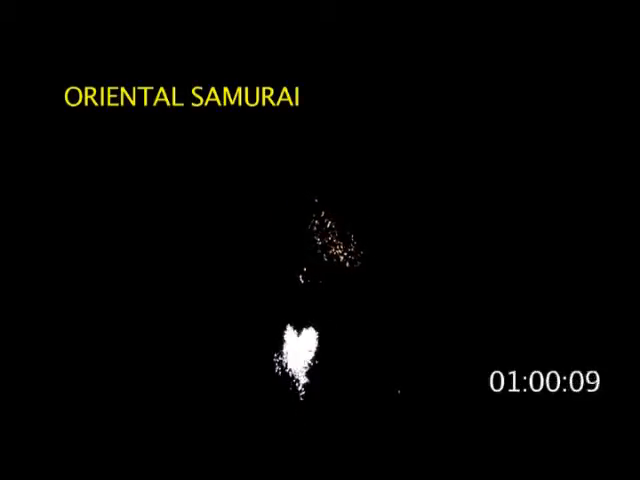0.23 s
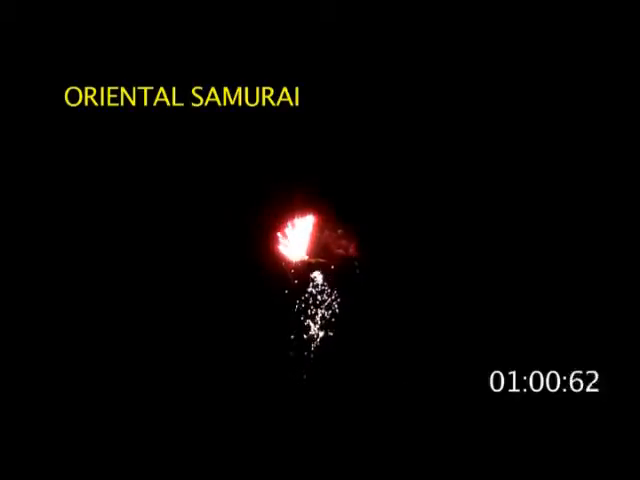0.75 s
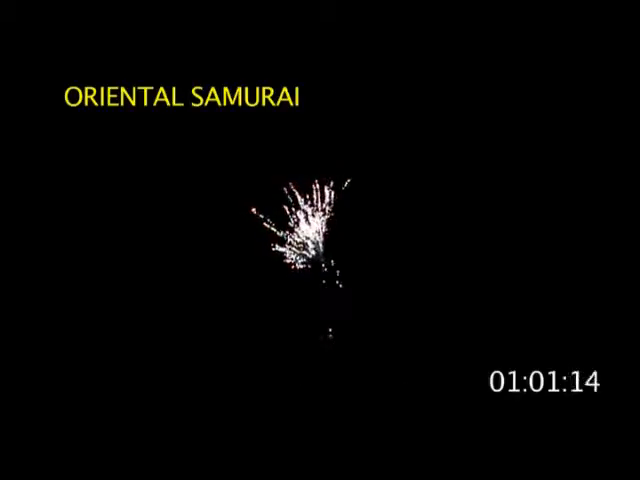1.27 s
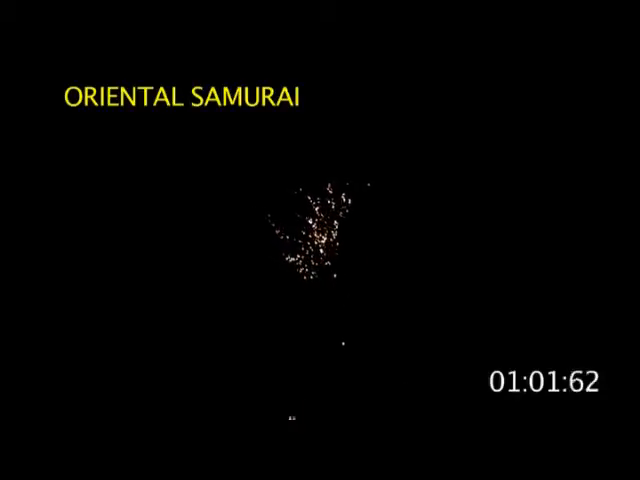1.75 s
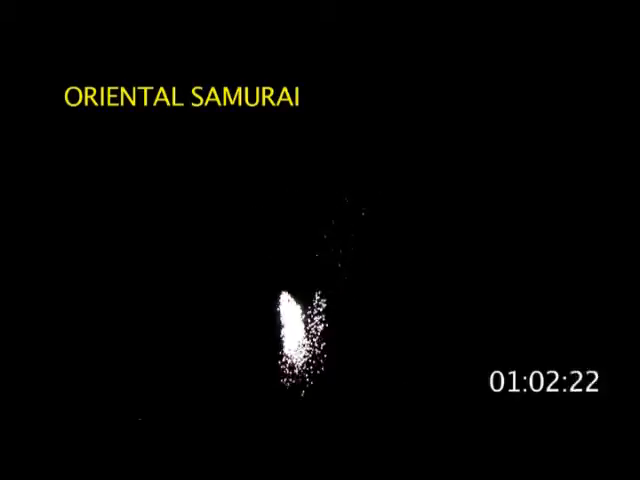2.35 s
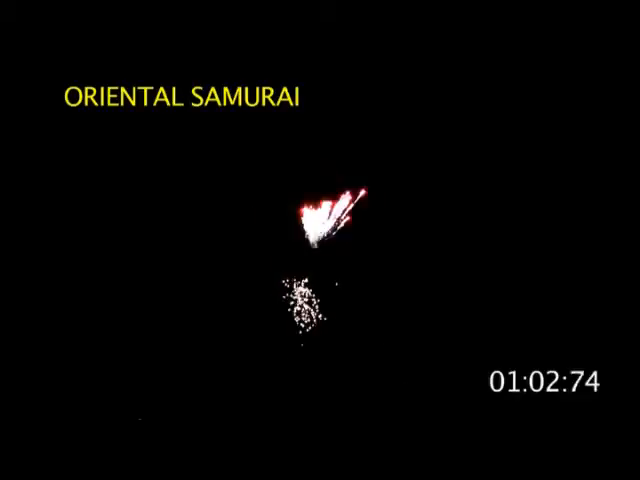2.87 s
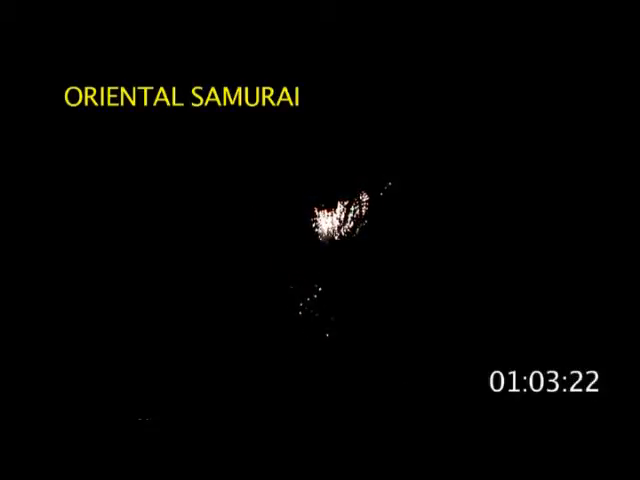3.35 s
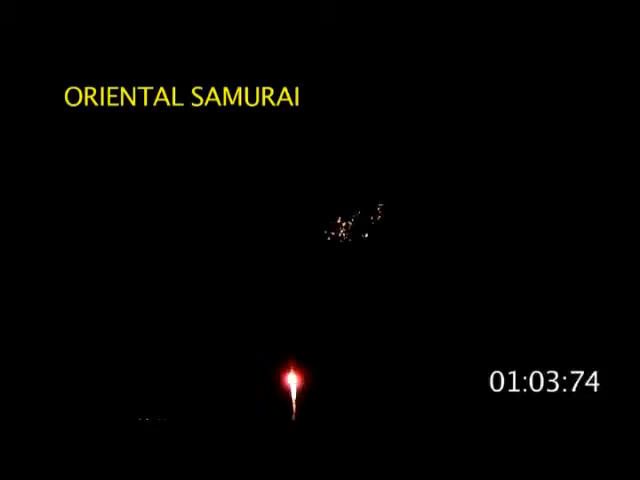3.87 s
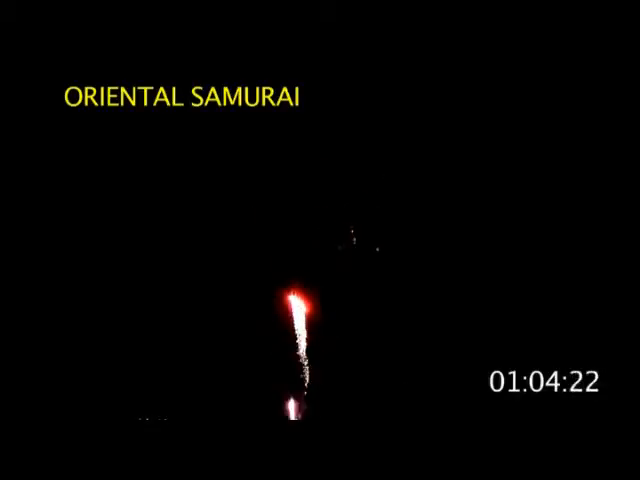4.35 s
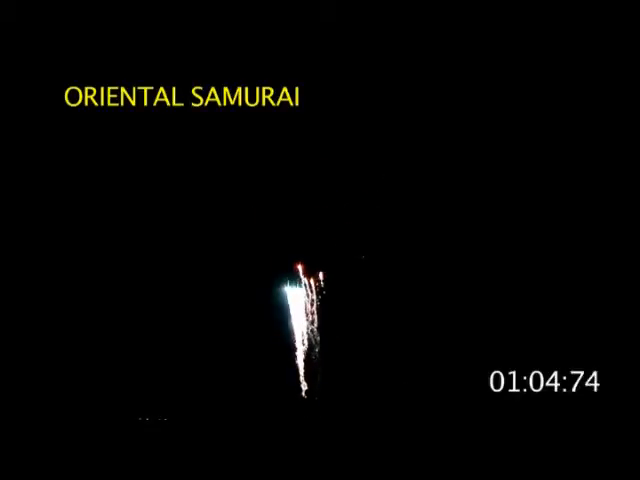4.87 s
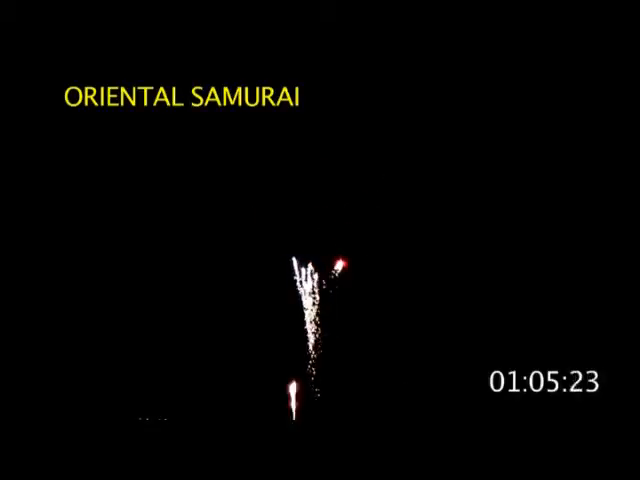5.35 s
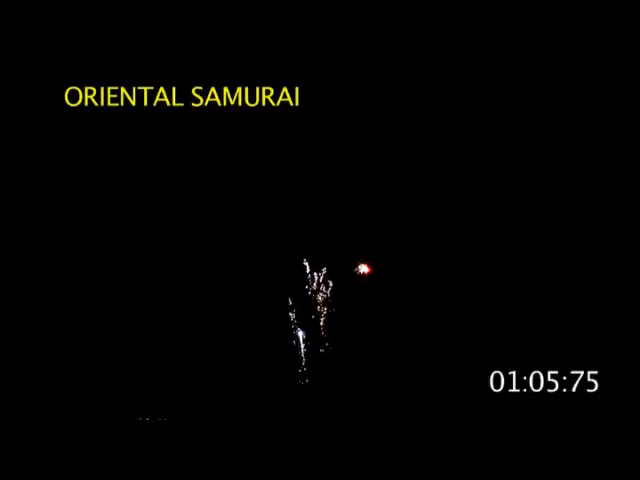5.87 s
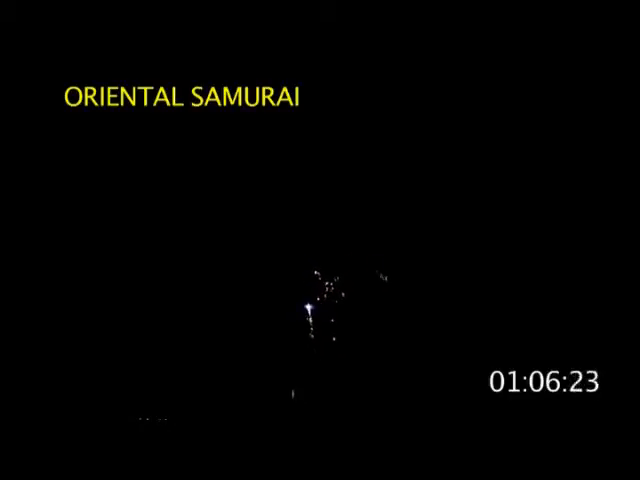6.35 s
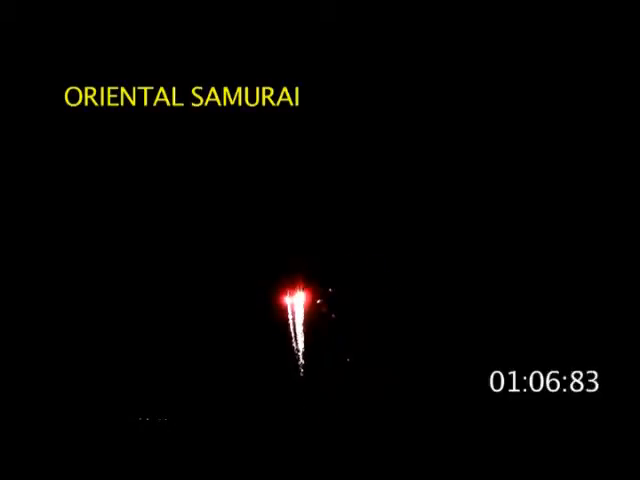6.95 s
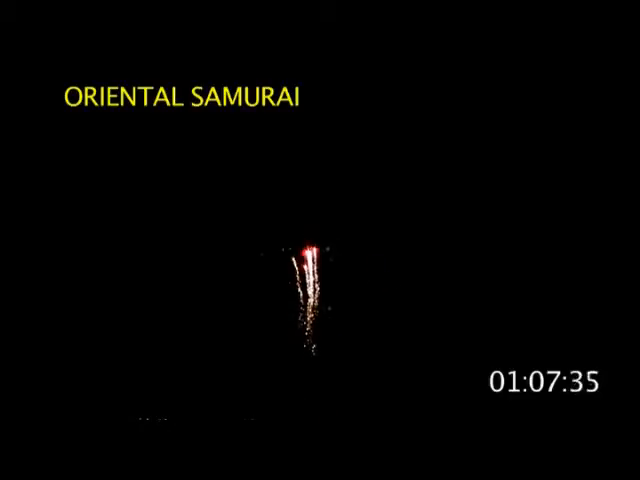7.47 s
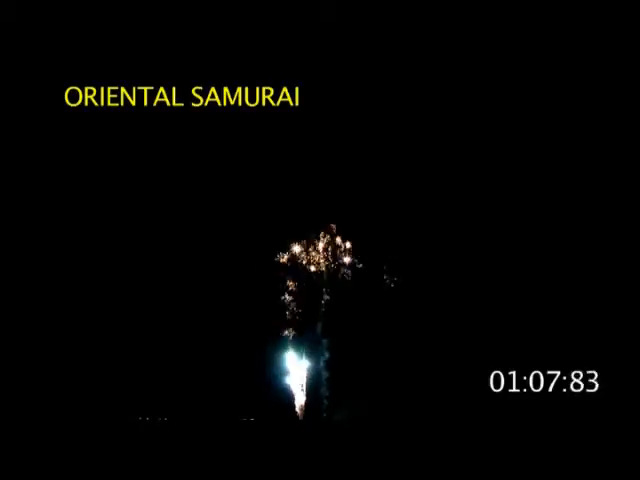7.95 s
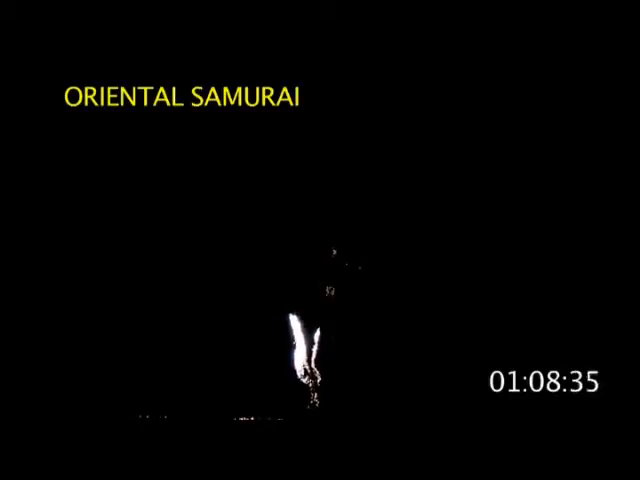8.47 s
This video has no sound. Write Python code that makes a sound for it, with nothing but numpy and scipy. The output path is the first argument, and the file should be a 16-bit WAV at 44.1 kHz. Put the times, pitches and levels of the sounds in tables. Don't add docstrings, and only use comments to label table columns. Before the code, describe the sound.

A firework cake fires in open ground at night. Two heavy hollow thumps each send up a hissing comet that breaks about three quarters of a second later with a sharp, clipped bang and scattered echoes. Weaker pops and faint hisses follow, then a medium thump, a third bang, and a burst of dense snapping crackle. A small stereo microphone overloads on the bursts over a quiet, low night background.

```python
import sys
import numpy as np
from scipy import signal
from scipy.io import wavfile
from scipy.ndimage import uniform_filter1d

SR = 44100
rng = np.random.default_rng(int(sys.argv[2]) if len(sys.argv) > 2 else 0)


def transcribe(signal):
    frames = np.atleast_2d(signal).T
    limited = np.clip(frames, -1, 1)
    pcm = np.round(limited * 32767).astype(np.int16)
    wavfile.write(sys.argv[1], SR, pcm)


def ratio(d):
    e = np.asarray(d, float) / 20
    return 10 ** e


N = 384111

# frequency in Hz, level in dB.
NIGHT_TONE = [(20, -19), (45, 4), (90, 1.5), (200, -4.5), (450, -19.5), (1100, -9), (1700, -19.5),
              (3000, -19.5), (5500, -30.5), (7500, -34.5), (14000, -37.5), (14300, -68.5)]
# time in seconds, level
# in dB.
FAR_ROAD = [(0, -58), (0.249, -66.5), (2.6, -70.5), (4.0, -72.5), (4.5, -67), (4.8, -70), (5.4, -73.5),
            (6.1, -75.5), (6.6, -70), (7.2, -74.5), (8.71, -80)]
# lit at in seconds, climb in seconds, loudest
# hiss in dB, fade in dB per second.
COMETS = [
    (-.2, 0.098, -64.5, 11.5),
    (.23, 0.27, -53.5, 29.5),
    (2.071, 0.16, -54, 26.5),
    (4.02, 0.033, -66.5, 24),
    (4.62, 0.15, -65, 25.5),
    (5.55, 0.18, -64.5, 28.5),
    (6.539, 0.091, -68, 4.5),
    (6.8, 0.26, -79, 23.5),
]
COMET_SWELL_DB, COMET_ROAR_DB = 8.5, -10.5
# middle in seconds, level in dB, length in seconds.
SPUTTERS = [
    (0.447, -35.5, 0.039),
    (0.45, -60, .008),
    (2.25, -60, 0.016),
    (2.291, -39.5, 0.029),
    (4.847, -58, .03),
    (5.61, -51.5, 0.037),
    (5.785, -53, 0.033),
    (6.775, -48, 0.032),
]
# start in seconds, level in dB, ring in Hz, left over right in dB.
DEBRIS = [(0.48, -18.5, 1195, 3.5), (0.861, -45.5, 1240, -16), (0.889, -46.5, 1256, -29),
          (1.53, -52.5, 830, 20), (1.583, -43.5, 2076, 6.5), (3.452, -56, 1045, 4),
          (3.541, -49.5, 1045, -4), (3.597, -60, 930, 8), (3.653, -53, 1220, 9), (4.235, -57.5, 1330, 13.5),
          (5.276, -56, 1785, 10), (5.634, -60, 1210, 3.5), (5.762, -49, 2280, 3), (5.772, -46, 2246, -1),
          (5.78, -44, 2280, 0.5), (5.853, -51, 4400, -9), (5.895, -51, 4800, 4), (6.464, -54, 1520, -10),
          (6.488, -54, 1776, -8.5), (6.755, -49.5, 1327, -1.0), (7.654, -32.5, 2840, 2)]
# time in seconds, level in dB, pitch in Hz.
SQUEAK = [
    (1.106, -37, 1070),
    (1.125, -43, 1050),
    (1.165, -31, 1048),
    (1.19, -50, 1010),
]

# delay in seconds, level over the scatter in dB, spread in seconds.
WALLS = [(.115, -1.5, .011), (.15, -1, .025), (.215, 0, .04), (0.253, -4, .011), (.305, -4, .03),
         (0.357, -6, .011), (.408, -6, .011), (0.468, -3, .03), (0.572, -7, .015), (.625, -6, .012),
         (.71, -7, .02), (.77, -7, .02)]
# frequency in Hz, level in dB.
LAND_TONE = [(40, 13.5), (150, 0), (1000, -3.5), (3000, -4.5), (6000, -2), (10000, 7), (15000, 5)]
# frequency in Hz, fading in dB per second.
LAND_LOSS = [(300, 1.5), (2000, -4), (5000, 13.5), (8000, 41.5), (15000, 85)]
# frequency in Hz, level in dB.
NEAR_TONE = [(100, -26), (300, -14.5), (700, 6.5), (2000, -3.5), (5000, -2.5), (10000, 1)]
# frequency in Hz, left-right difference above the middle in dB.
WIDTH = [(40, -20), (110, -22), (200, -12), (380, -6), (700, 1.5), (1290, -1.5), (2600, -11.5),
         (4400, -1.5), (7000, 5), (15000, -3.5)]
GROUND_DB, GROUND_FADE_DB_PER_S, GROUND_BASS_DB = -42, 71.5, 4.5
SLOPES_S, SLOPES_RISE_S, SLOPES_DB, SLOPES_FADE_DB_PER_S, SLOPES_BASS_DB = 0.13, 0.023, -43, 46.5, 3
SLOPES_END_S, SLOPES_END_DB = .42, -7
HILLS_DB, HILLS_FADE_DB_PER_S, HILLS_BASS_DB = -54, 14.5, 9

# time in seconds, level in dB.
LONE_STARS = [(0.452, -12), (0.4536, -10.5), (0.4798, -8.5), (0.481, -23), (7.8106, -33.5), (7.858, -12),
              (7.9036, -19), (7.9302, -13), (7.9378, -26), (8.3885, -11.5), (8.4412, -7.5), (8.4449, -25),
              (8.4622, -6), (8.473, -25), (8.5353, -14), (8.5771, -14), (8.6249, -17.5)]
# time in seconds, level in dB.
BIG_STARS = [(7.9622, -10), (8.0018, -9), (8.0077, -10), (8.0267, -7), (8.0333, -6), (8.0393, -6),
             (8.0449, -8), (8.0691, -8), (8.0911, -7), (8.1077, -6), (8.1129, -4), (8.1284, -9),
             (8.1549, -9), (8.1625, -7), (8.1876, -8), (8.2002, -4), (8.2172, -3), (8.2271, -6),
             (8.2317, -7), (8.2479, -7), (8.2531, -8), (8.2688, -8), (8.2813, -8), (8.3479, -9),
             (8.353, -7)]
CROWD_FROM_S, CROWD_TO_S, CROWD_STARS = 7.942, 8.378, 96
CROWD_DB, CROWD_ARCH_DB, CROWD_SPREAD_DB = -14.5, 4, 8

# start in seconds, thump in dB, muzzle crack in dB.
LAUNCHES = [(0.2227, -3, -20.5), (2.0632, -2.5, -20.5), (3.897, -43, -77), (3.928, -46, -74),
            (4.02, -38.5, -48), (4.026, -29.5, -44.5), (4.6201, -46, -45), (4.6259, -22.5, -42.5),
            (5.5414, -38, -52), (5.5479, -27, -34), (6.5424, -14.5, -32.5), (6.8021, -32.5, -34),
            (6.8069, -20.5, -33.5), (7.8443, -27.5, -43)]
# pitch in Hz, level in dB, time to fade by 60 dB in seconds, sign.
TUBE_RINGS = [
    (236, -2.5, .032, 1),
    (106, -5, .028, -1),
]
# delay in seconds, gain.
TUBE_ECHOES = [
    (.0046, -.79),
    (.0112, -.25),
    (.0123, .23),
]
# start in seconds, level in dB, push in ms, ground echo delay in ms,
# second front in dB.
BURSTS = [
    (.9614, 12, 0.37, 2.6, -13),
    (2.8355, 11, 0.38, 2.7, -7),
    (7.2984, 11.5, 0.32, 2.45, -7),
]
SECOND_FRONT_S, GROUND_ECHO_DB = .00043, -12

# frequency in Hz, gain in dB.
MIC_TONE = [(15, -18), (40, -3.5), (70, 1), (1300, 4.5), (2250, 7), (3000, 9), (3900, 5), (4400, -0.5),
            (4900, 6), (7500, -16), (9500, -6.5), (13000, -15), (15400, -28), (16100, -41.5)]


def evened(x):
    return x / np.sqrt(np.mean(x ** 2) + 1e-20)


def read(points, hz):
    f, value = np.transpose(points)
    return np.interp(np.log(hz + 1), np.log(f + 1), value)


def add(mix, s, sound):
    part = mix[..., round(s * SR):][..., :sound.shape[-1]]
    part += sound[..., :part.shape[-1]]


def band_db(hz, centre_hz, octaves):
    return -6 * (np.log2((hz + 1) / centre_hz) / octaves) ** 2


def cloud(field_db, size, patchy_db, flicker_db):
    frames, hz = size // 128 + 5, np.fft.rfftfreq(512, 1 / SR)[:, None]
    a, b, c, d, patches = rng.standard_normal((frames, 257, 5)).T
    patches = uniform_filter1d(patches, size=6, axis=0)
    patches = evened(uniform_filter1d(patches, size=8, axis=1))
    flicker = evened(uniform_filter1d(rng.standard_normal(frames), size=3))
    mid = a + 1j * b
    side = (c + 1j * d) * ratio(read(WIDTH, hz))
    t = np.arange(frames) * 128 / SR
    level = ratio(field_db(hz, t) + patchy_db * patches + flicker_db * flicker)
    left_right = np.array([mid + side, mid - side]) * level
    return signal.istft(left_right, nperseg=512, noverlap=384)[1][:, :size]


def blast(ms):
    u = np.arange(1500) / SR / (ms / 1000)
    return np.convolve((1 - u) * np.exp(-u), [.3, .4, .3])


def snap(ms):
    u = np.arange(60) / SR / (ms / 1000)
    return (1 - 2 * u) * np.clip((1 - u) * ms * SR / 1000 + .5, 0, 1)


def comets_db(t):
    power = 1e-10
    for lit, climb, db, fade in COMETS:
        climb_left = np.clip(1 - (t - lit) / climb, 0, 1)
        burning_out = np.maximum(t - lit - climb, 0)
        swell_db = -COMET_SWELL_DB * climb_left - fade * burning_out
        power = power + (t > lit) * ratio(db + swell_db) ** 2
    return 10 * np.log10(power)


def night():
    at, road = np.transpose(FAR_ROAD)

    def field_db(hz, t):
        hiss_db, road_db = comets_db(t), np.interp(t, at, road)
        layers = [band_db(hz, 2400, 0.73) + hiss_db - 11.5,
                  band_db(hz, 4950, 0.03) + hiss_db - 18,
                  band_db(hz, 12000, 0.55) + hiss_db - 35.5 - 60 * (hz > 14200),
                  band_db(hz, 770, 0.17) + hiss_db + COMET_ROAR_DB,
                  band_db(hz, 1080, .42) + road_db - 5.5,
                  band_db(hz, 550, .5) + road_db - 8.5,
                  band_db(hz, 98, 1.0) + road_db + 5.0,
                  read(NIGHT_TONE, hz) - 67]
        for middle, db, length in SPUTTERS:
            swish_db = db - 17.5 - 6 * ((t - middle) / (length / 2)) ** 2
            layers.append(band_db(hz, 2320, 0.52) + swish_db)
        for start, *_ in BURSTS:
            fizz_db = -79 - 6 * ((t - start - .075) / 0.085) ** 2 - 90 * (t < start + .01)
            layers.append(band_db(hz, 11500, .5) + fizz_db - 60 * (hz > 15000))
        return 10 * np.log10(sum(ratio(db) ** 2 for db in layers))

    return cloud(field_db, N, patchy_db=2.0, flicker_db=-0.14)


def ticks():
    t, out = np.arange(900) / SR, np.zeros((2, N))
    for s, db, hz, pan in DEBRIS:
        ring = np.sin(2 * np.pi * hz * t) * np.minimum(t / 0.00084, 1) * ratio(-60 * t * hz / 16)
        sides_db = np.array([[pan / 2], [-pan / 2]])
        add(out, s, ratio(db + 10.5 + sides_db) * ring)
    s, db, hz = np.transpose(SQUEAK)
    t = np.arange(s[0], s[-1], 1 / SR)
    wobble = evened(uniform_filter1d(rng.standard_normal(len(t)), size=200))
    pitch = np.interp(t, s, hz) * (1 + 0.0255 * wobble)
    turn = 2 * np.pi * np.cumsum(pitch) / SR
    add(out, s[0], ratio(np.interp(t, s, db)) * (np.sin(turn) + 0.46 * np.sin(2 * turn)))
    return out


def land(x):
    def field_db(hz, t):
        low = 1 / (1 + (hz / 260) ** 3)
        walls = sum(ratio(g - 9 * ((t - d) / spread) ** 2) ** 2 for d, g, spread in WALLS)
        wall_gain = (6 + 6 / (1 + (hz / 900) ** 2)) * hz / (hz + 110)
        arrived = np.clip((t - SLOPES_S) / SLOPES_RISE_S, 0, 1) ** .5
        ground = ratio(GROUND_DB + GROUND_BASS_DB * low - GROUND_FADE_DB_PER_S * t)
        slopes_db = SLOPES_DB + SLOPES_END_DB * (t > SLOPES_END_S) + SLOPES_BASS_DB * low
        slopes_fade_db = SLOPES_FADE_DB_PER_S * (t - SLOPES_S - SLOPES_RISE_S)
        slopes = arrived * ratio(slopes_db - slopes_fade_db)
        hills = arrived * ratio(HILLS_DB + HILLS_BASS_DB * low - HILLS_FADE_DB_PER_S * t)
        scatter = (ground ** 2 + slopes ** 2 + hills ** 2) * (1 + wall_gain * walls)
        return 10 * np.log10(scatter) + read(LAND_TONE, hz) - t * read(LAND_LOSS, hz)

    echoes = ratio(-38) * cloud(field_db, SR * 2, patchy_db=2.0, flicker_db=0.8)
    echoes[:, :700] *= np.linspace(0, 1, 700)
    near = cloud(lambda hz, t: read(NEAR_TONE, hz) + 0 * t, 1500, patchy_db=-5.0, flicker_db=2.5)
    near_fade = ratio(-55.5 - 60 * np.arange(1500) / SR / 0.024)
    add(echoes, .0015, near * near_fade)
    return signal.fftconvolve(x[None], echoes, axes=1)[:, :N]


def yard(x):
    def field_db(hz, t):
        return band_db(hz, 170, 1.2) - 80.5 - 55 * t - 40 * (t < .02)

    puffs = cloud(field_db, SR // 2, patchy_db=1.5, flicker_db=4)
    return signal.fftconvolve(x[None], puffs, axes=1)[:, :N]


def stars():
    place, luck = rng.random((CROWD_STARS, 2)).T
    share = (np.arange(CROWD_STARS) + place) / CROWD_STARS
    crowd_s = CROWD_FROM_S + share * (CROWD_TO_S - CROWD_FROM_S)
    crowd_db = CROWD_DB + CROWD_ARCH_DB * np.sin(np.pi * share) - CROWD_SPREAD_DB * luck
    events = LONE_STARS + BIG_STARS + list(zip(crowd_s, crowd_db))
    out = np.zeros(N)
    chance = rng.random((len(events), 5))
    grass = rng.standard_normal((len(events), 160))
    for (s, db), (size, height, late, small, other), rough in zip(events, chance, grass):
        pop = snap(0.2 + 0.15 * size)
        add(out, s - .0002, ratio(db - 2.5) * pop)
        add(out, s - .0002, ratio(db - 19) * blast(.55))
        ground_push = np.convolve(blast(.5), np.ones(12) / 12)
        add(out, s + .0028, ratio(db - 20) * ground_push)
        smeared = np.convolve(pop, rough * np.hanning(160))
        add(out, s + .0012 + .0009 * height, ratio(db - 25.5) * smeared)
        if CROWD_FROM_S < s < CROWD_TO_S:
            add(out, s + .002 + .006 * late, ratio(db - 8 - 7 * small) * snap(.22 + .15 * other))
    return out


def launches():
    t, out = np.arange(3000) / SR, np.zeros(N)
    ring = np.zeros(3000)
    for hz, db, t60, sign in TUBE_RINGS:
        ring += sign * ratio(db - 60 * t / t60) * np.sin(2 * np.pi * hz * t)
    ring = uniform_filter1d(np.pad(ring, (15, 0)), size=30)
    thump = ring.copy()
    for delay, gain in TUBE_ECHOES:
        add(thump, delay, gain * ring)
    hiss = rng.standard_normal((len(LAUNCHES), 3000))
    gas = signal.lfilter(*signal.butter(1, [1900, 4600], "band", fs=SR), hiss)
    rip = np.minimum(t / 0.00077, 1) * (ratio(-60 * t / 0.0023) + ratio(1.5 - 60 * t / 0.04))
    knock = ratio(-14 - 60 * t / 0.045) * np.minimum(t / 0.0036, 1) * np.sin(2 * np.pi * 322 * t)
    slow_push = np.convolve(blast(4.5), np.hanning(200) / 100)
    for (s, db, crack_db), puff in zip(LAUNCHES, gas):
        add(out, s + .00065, ratio(db) * thump)
        add(out, s + .0095, ratio(db) * knock)
        add(out, s, ratio(crack_db) * rip * puff)
        if db < -18:
            add(out, s + .0055, ratio(db - 9) * slow_push)
    return out


def bursts():
    out, fronts = np.zeros(N), np.zeros(N)
    for s, db, ms, echo_ms, second_db in BURSTS:
        front = blast(ms)
        shock = 0.88 * front
        add(shock, SECOND_FRONT_S, ratio(second_db) * front)
        add(fronts, s, ratio(db) * front)
        add(out, s, ratio(db) * shock)
        echo = uniform_filter1d(np.pad(front, (5, 0)), size=9)
        echo_s, echo_db = s + echo_ms / 1000, db + GROUND_ECHO_DB
        add(out, echo_s, ratio(echo_db) * echo)
        add(out, echo_s + SECOND_FRONT_S, ratio(echo_db + second_db + 8) * echo)
        add(out, s + 0.0052, ratio(db - 19) * np.convolve(blast(0.82), np.hanning(90) / 45))
        add(out, s + .0077, ratio(db - 22.5) * np.convolve(blast(0.96), np.hanning(70) / 35))
    return out, fronts


def microphone(x):
    gain = np.log(ratio(read(MIC_TONE, abs(np.fft.fftfreq(8192, 1 / SR)))))
    response = np.exp(gain - 1j * signal.hilbert(gain).imag)
    taps = np.fft.ifft(response).real[:4096]
    heard = signal.oaconvolve(x, taps[None], axes=1)[:, :N]
    port_band = signal.butter(2, [4800, 8000], "band", fs=SR)
    ports = signal.lfilter(*port_band, np.gradient(heard.mean(0)))
    return heard + 0.59 * np.array([ports, -ports])


def scene():
    lifts, crackle = launches(), stars()
    shells, fronts = bursts()
    echoes = land(ratio(-11) * lifts + fronts + crackle) + yard(lifts)
    return microphone(lifts + shells + crackle + echoes) + ticks() + night()


def band_limit(x):
    return signal.sosfilt(signal.butter(12, 16430, fs=SR, output="sos"), x)


def record(dry):
    clipped = np.clip(dry, -1, 1)
    return band_limit(clipped)


dry = scene()
out = record(dry)
transcribe(out)
```